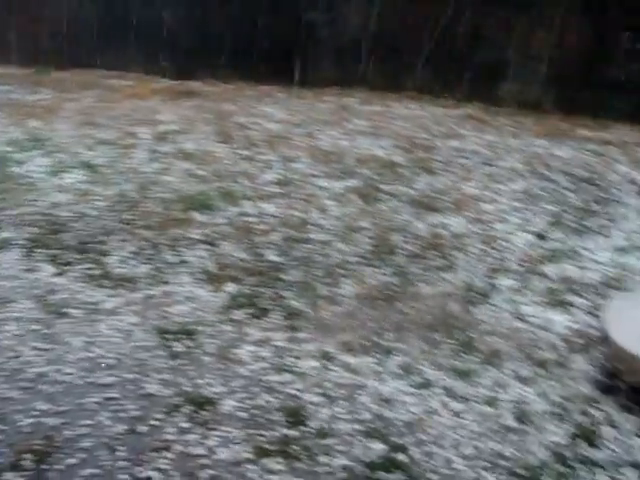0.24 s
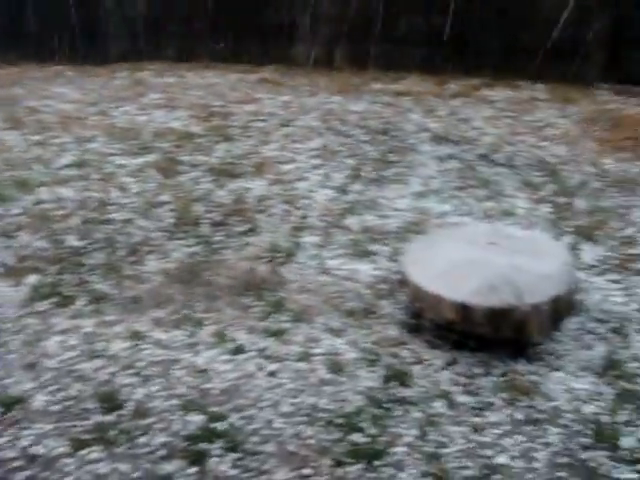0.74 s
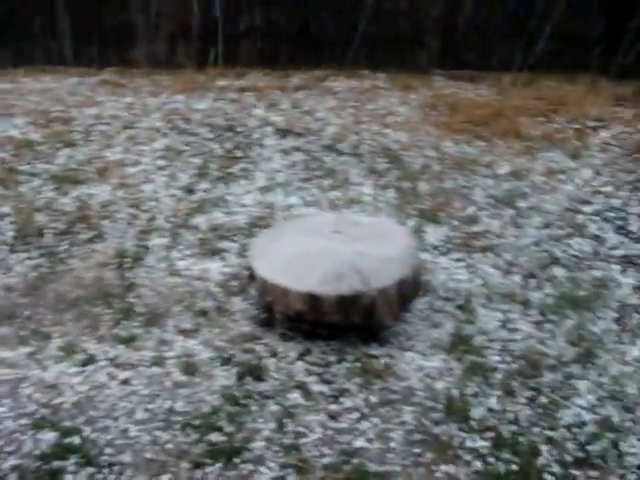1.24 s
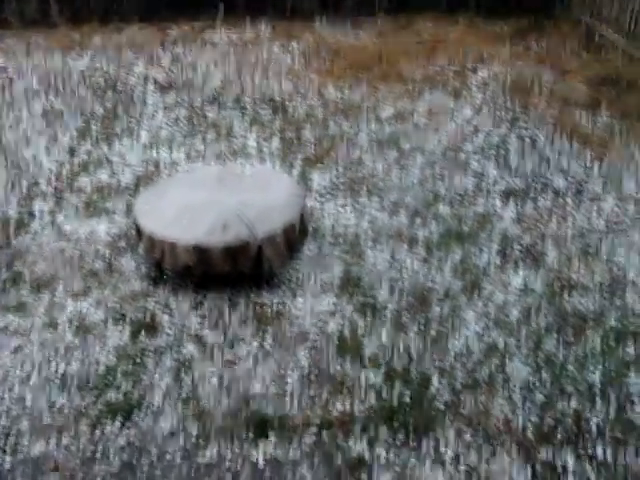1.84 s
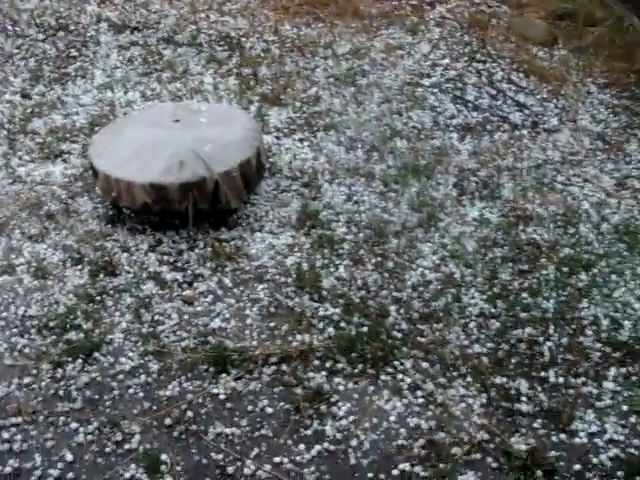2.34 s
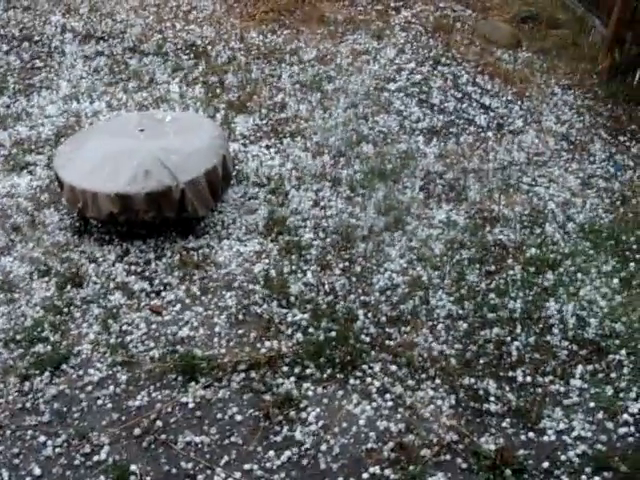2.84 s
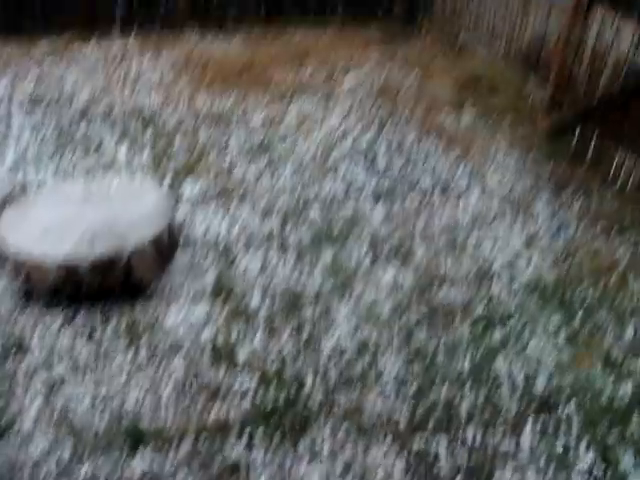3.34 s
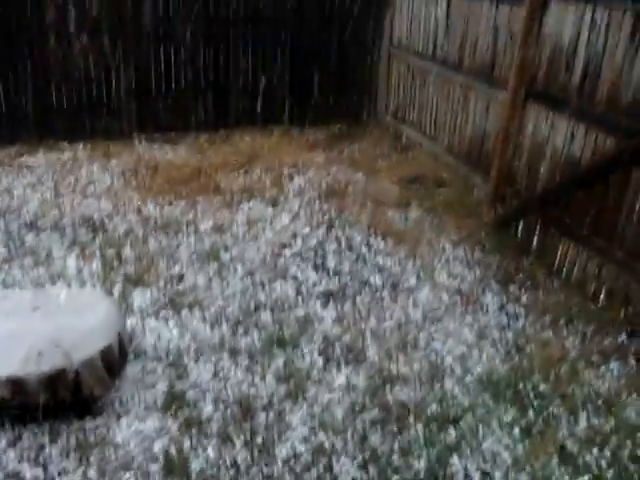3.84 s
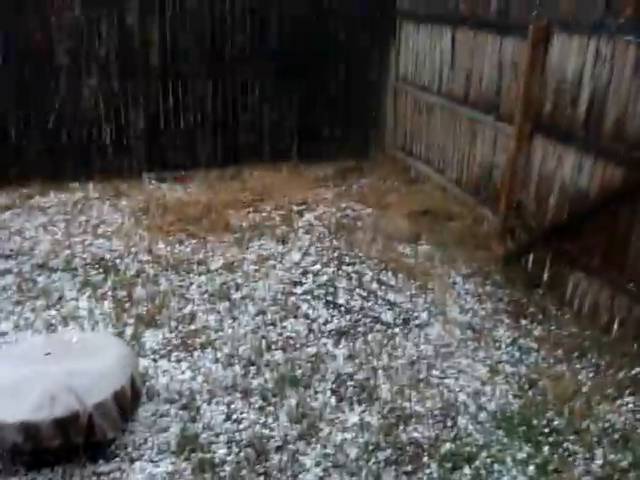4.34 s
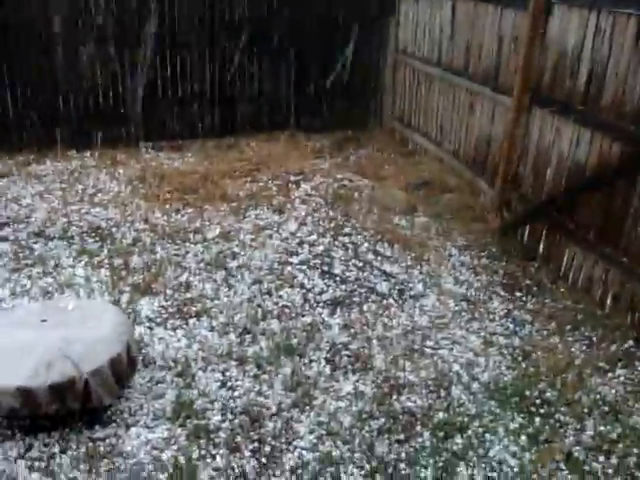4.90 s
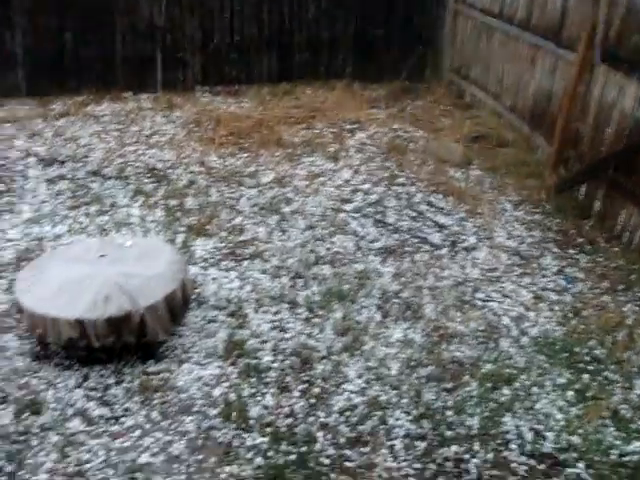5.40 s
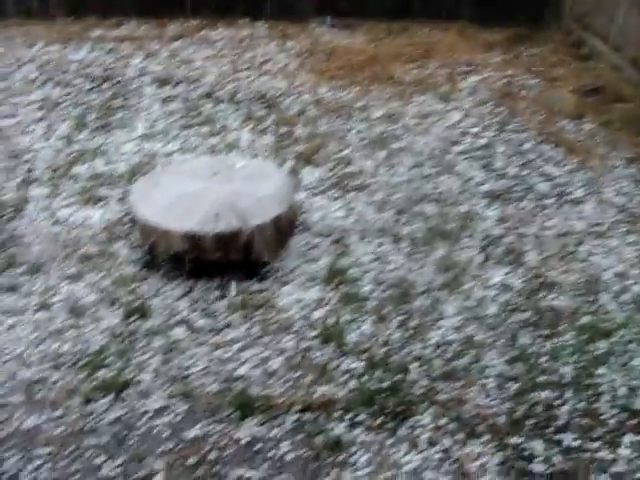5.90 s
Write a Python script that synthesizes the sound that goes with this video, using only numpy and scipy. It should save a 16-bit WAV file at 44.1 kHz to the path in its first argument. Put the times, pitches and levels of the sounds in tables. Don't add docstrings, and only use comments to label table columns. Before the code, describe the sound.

Dense hail pelts a backyard lawn, paving and wooden fence in a steady loud roar, with sharp nearby ticks and occasional dull wooden thuds.

```python
import sys
import numpy as np
from scipy import signal
from scipy.fft import rfft, irfft, next_fast_len
from scipy.io import wavfile

SR = 44100
rng = np.random.default_rng(int(sys.argv[2]) if len(sys.argv) > 2 else 0)


def unload_wav(signal):
    wavfile.write(
        sys.argv[1],
        SR,
        np.round(np.clip(np.atleast_2d(signal).T, -1, 1) * 32767).astype(np.int16),
    )


def undo_db(level):
    steps = np.asarray(level, float) / 20
    return 10 ** steps


N = 271656

# t/s, density/dB, lean/dB
SHOWER = [(0, -17.5, 2.5), (.2, -17.5, 0), (.6, -17, 1), (.75, -18.5, -0.5), (1.28, -17.5, 0.5),
          (1.5, -17.5, 0.5), (1.95, -20.5, -0.5), (2.2, -17.5, 0.5), (3.4, -17.5, -0.5), (3.5, -17.5, 0),
          (3.7, -17.5, -1), (4.4, -18, -1), (4.9, -17, -0.5), (5.25, -19.5, 0.5), (5.42, -17.5, 1),
          (5.65, -19.5, -0.5), (5.85, -18, 2.5), (6.16, -20, -0.5)]
# f/Hz, level/dB
ROAR_COLOUR = [(25, -26), (217, -7), (705, -1.5), (1390, -4.5), (3700, -3), (5670, -10.5), (9370, -11.5),
               (10100, -18)]
SPLITS = (1200, 5000)
# t/s, rise/dB
FLURRIES = [(.43, 0), (.665, 4.5), (1.26, 4), (1.56, 3), (1.88, 4), (2.28, 1.5), (2.86, 2.8), (3.23, 2.5),
            (3.34, 1.5), (3.51, 1), (3.86, 4), (4.15, 3.5), (4.67, 3), (4.93, 2), (6.03, 0)]
# t/s, depth/dB
DUCKS = [(.18, 5.5), (.75, 1), (1.33, 3.5), (1.47, 4.2), (1.82, 2.1), (1.92, 1), (2.36, 1.5), (2.91, 3.1),
         (3.55, 2.5), (4.25, 2.5), (4.97, 2.5), (5.2, 1), (5.65, 0), (5.99, 0.5)]
# t/s, peak level/dB, ring f/Hz
BOOMS = [
    (1.348, -18, 304),
    (1.409, -20, 231),
    (1.424, -19, 335),
    (3.811, -20, 353),
    (4.062, -18.5, 239),
    (4.178, -21.5, 232),
    (5.434, -16.5, 340),
    (5.714, -22, 217),
    (5.899, -20, 400),
    (5.93, -23, 156),
]
# t/s, peak level/dB, ring f/Hz
THUDS = [(1.319, -23, 710), (1.334, -18, 657), (1.349, -11.5, 766), (1.409, -18, 547), (1.996, -14, 590),
         (2.165, -20, 940), (2.656, -20, 675), (3.381, -16, 710), (3.417, -15, 615), (3.81, -31, 720),
         (4.064, -12, 725), (4.18, -17, 440), (4.859, -17, 820), (5.359, -14, 740), (5.398, -18, 1040),
         (5.434, -14, 600), (5.718, -18, 820), (5.759, -15, 620), (5.875, -16, 690), (5.899, -15, 563),
         (5.915, -19, 720), (3.48, -13, 800), (.6, -15, 654), (.99, -16, 720)]
# t/s, peak level/dB, ring f/Hz
PAVING = [(.2354, -11, 4160), (.6784, -2, 3560), (.7344, -7, 3380), (.7374, -7, 3230), (.9954, -16, 2900),
          (1.0114, -2, 3620), (1.3094, 2, 4250), (1.8522, 2.5, 4130), (2.2994, 0, 3420),
          (2.4354, -0.5, 3250), (2.6234, 1, 3520), (2.7284, -3, 3920), (2.7354, 0, 3700),
          (2.8854, -9, 3070), (2.9023, 0, 4070), (3.1244, -2.5, 3080), (3.3954, -6, 3450),
          (3.5204, -1, 3100), (3.7264, -7, 4230), (3.7828, -3, 3550), (3.8534, 0, 3770), (4.4054, -2, 4150),
          (4.4134, -0.5, 3560), (4.565, 0.5, 3120), (4.6144, -12, 4020), (5.002, -3, 4550),
          (5.4354, -1, 3500), (5.5984, 0, 3400), (5.6254, -1, 4120), (6.1165, 3, 3930)]
# t/s, peak level/dB, ring f/Hz
FENCE = [(.0204, -13, 1960), (.3544, -8, 1680), (.4614, -1, 2020), (1.2944, -2, 1860), (1.6244, -1.5, 1310),
         (1.9026, -6, 2240), (3.1514, -9, 2650), (3.4754, -9, 2220), (3.5004, -2, 2350), (3.5793, 0, 2820),
         (3.8114, -3, 2370), (4.0324, -4, 2000), (4.7254, 1.5, 1410), (5.1936, 0, 2500), (5.3926, -4, 1620),
         (5.9705, 1.5, 3400), (5.9735, 1, 2510)]
# t/s, peak level/dB, ring f/Hz
BURSTS = [(.1274, -4, 2960), (.173, -7, 2330), (.674, -16, 2050), (1.3922, -13, 2760), (1.8054, -8, 3560),
          (1.8754, -4, 3070), (1.8834, -20, 2170), (4.3504, -5, 3640), (4.8224, -13, 2050),
          (4.9412, -7, 2570), (5.0694, -2, 1960), (5.1344, -8, 3100)]
# t/s, extra step level/dB, lowest f/Hz affected
STARVED = [(0.165, 28, 7500), (0.189, 36.5, 7000), (0.688, 45, 6400), (1.399, 13, 6500), (1.47, 6, 8000),
           (1.799, 20, 6000), (1.865, 23, 5000), (1.895, 11, 5500), (1.91, 16, 5540), (2.91, 10, 5000),
           (3.55, 5, 5200), (3.839, 26, 5000), (4.25, 22, 6950), (4.87, 6, 6500), (4.98, 14, 6000),
           (5.20, 10, 7000), (5.64, 13, 6000), (5.987, 31, 6000), (6.13, 15, 5000)]

ROOF_DB, ICE_DB = -5, -7.5
ICE_FOLLOWS = 0.29
FLURRY_S = 0.013
DUCK_ATTACK_S, DUCK_RELEASE_S = 0.0087, 0.036
TICK_T60_S, TICK_SUSTAIN_PER_DB = 0.0041, 0.14
PAVING_CRACK_DB, FENCE_CRACK_DB, BURST_CRACK_DB = -17.5, -21, -8


def rms_one(x):
    return x / np.sqrt(np.mean(x ** 2) + 1e-20)


def drift(rate):
    r = np.exp(-40 * np.pi * rate / SR)
    slow = signal.lfilter([1], [1, -2 * r, r * r], rng.standard_normal(N // 20 + 4002))[4000:]
    return np.interp(np.arange(N) / 20, np.arange(len(slow)), rms_one(slow))


def impacts(count, spread_db):
    when, size, sign = rng.random((3, count))
    strength_db = spread_db * np.minimum(-np.log(size + 1e-9), 4.5)
    out = np.zeros(N)
    out[(when * N).astype(int)] = undo_db(strength_db) * np.sign(sign - .5)
    return rms_one(out)


def ring(clicks, hz, t60):
    r, w = undo_db(-60 / (t60 * SR)), 2 * np.pi * hz / SR
    return signal.lfilter([0, np.sin(w)], [1, -2 * r * np.cos(w), r * r], clicks + 1e-18)


def swell(click, hz, t60):
    x = ring(ring(click, hz, t60), hz, t60)
    return x / np.abs(x).max()


def levels():
    t = np.arange(N) / SR
    s, density, lean = np.transpose(SHOWER)
    density, lean = np.interp(t, s, density), np.interp(t, s, lean)
    duck = 0
    for s, db in DUCKS:
        fade_s = np.where(t < s, DUCK_ATTACK_S, DUCK_RELEASE_S)
        duck = duck + db * np.exp(-np.abs(t - s) / fade_s)
    flare = sum(db * np.exp(-((t - s) / FLURRY_S) ** 2) for s, db in FLURRIES)
    mean = density.mean()
    ice = ICE_DB + mean + ICE_FOLLOWS * (density - mean) + flare
    roof = density + ROOF_DB + lean
    return undo_db(np.array([roof, density, ice]) - duck)


def shower():
    layers = np.zeros((3, N))
    gust = drift(31)
    far = rng.standard_normal((2, N))
    shared = impacts(count=4000, spread_db=4.0)
    edges = 20 * 2 ** np.arange(0, 9.6, .5)
    for k, (low, high) in enumerate(zip(edges, edges[1:])):
        hz = np.sqrt(low * high)
        own = impacts(count=int(hz / 2) + 50, spread_db=2.5)
        shared_db = -3.5 + 2.5 * (hz > 3000)
        blows = far[k % 2] + undo_db(shared_db) * shared + undo_db(-5) * own
        band = signal.sosfilt(signal.butter(2, [low, high], "band", fs=SR, output="sos"), blows)
        wander_db = 0.57 * gust + 0.28 * drift(18) + 0.55 * drift(4.2)
        layers[np.searchsorted(SPLITS, hz)] += undo_db(wander_db) * band
    size = next_fast_len(N)
    bins = np.log(np.arange(size // 2 + 1) * SR / size + 1)
    colour_hz, colour_db = np.transpose(ROAR_COLOUR)
    colour = undo_db(np.interp(bins, np.log(colour_hz), colour_db))
    layers = irfft(rfft(layers, size) * colour, size)[:, :N]
    return sum(gain * rms_one(layer) for gain, layer in zip(levels(), layers))


def thuds():
    span = 4000
    out = np.zeros(N + span)
    click = np.eye(1, span)[0]
    for table, t60, knock_hz in ((THUDS, .025, 520), (BOOMS, .04, 210)):
        knock = undo_db(-5) * swell(click, knock_hz, t60 / 2)
        for s, db, hz in table:
            at = round(s * SR)
            out[at:at + span] += undo_db(db - 3) * (swell(click, hz, t60) + knock)
    return out[:N]


def ticks():
    span = 1200
    out = np.zeros(N + span)
    click = np.eye(1, span)[0]
    crack = swell(click, 7000, .0009) + undo_db(-1) * swell(click, 2400, .0012)
    surfaces = ((PAVING, PAVING_CRACK_DB), (FENCE, FENCE_CRACK_DB), (BURSTS, BURST_CRACK_DB))
    hits = [(*row, crack_db) for table, crack_db in surfaces for row in table]
    chances = rng.random((len(hits), 4))
    for (s, db, hz, crack_db), (lag, lag2, up, down) in zip(hits, chances):
        t60 = TICK_T60_S * np.exp(TICK_SUSTAIN_PER_DB * db)
        body = swell(click, hz, t60) + undo_db(crack_db + 14) * crack
        higher = swell(click, hz * (1.05 + .15 * up), .003)
        lower = swell(click, hz * (.85 - .3 * down), .003)
        body += undo_db(-7) * np.roll(higher, int(120 * lag))
        body += undo_db(-5) * np.roll(lower, int(120 * lag2))
        at = round((s + .0004) * SR)
        out[at:at + span] += undo_db(db - 7) * body
    return out[:N]


def scene():
    no_bass = signal.butter(3, 140, "high", fs=SR, output="sos")
    near = signal.sosfilt(no_bass, thuds() + ticks())
    return np.tile(shower() + near, (2, 1))


def thrifty_treble(x, step_db, starve_db, flutter_db, start_hz):
    hz, t, z = signal.stft(x, SR, nperseg=448)
    band = np.floor(np.log2(np.maximum(hz, 1) / start_hz) * 6).astype(int)
    swing, error = rng.normal(0, 1, (2, band.max() + 1, len(t)))[:, np.maximum(band, 0)]
    swing = swing + .5 * np.roll(swing, 1, axis=1)
    short_db = sum(db * np.outer(hz > low, np.exp(-((t - s) / .009) ** 4)) for s, db, low in STARVED)
    step = undo_db(step_db + short_db + starve_db * swing)
    passed = 1 / (1 + (step / (np.abs(z) + 1e-12)) ** 10)
    keep = undo_db(flutter_db * error) * passed + undo_db(-31)
    z = np.where(band[:, None] >= 0, z * keep, z)
    return signal.istft(z, SR, nperseg=448)[1][:N]


def band_limit(x):
    return signal.sosfilt(signal.butter(12, 11090, fs=SR, output="sos"), x)


def record(dry):
    top = undo_db(-5.2)
    x = dry[0] / (1 + np.abs(dry[0] / top) ** 8) ** (1 / 8)
    x = signal.sosfilt(signal.butter(2, 65, "high", fs=SR, output="sos"), x)
    x = signal.sosfilt(signal.ellip(12, .5, 90, 10150, fs=SR, output="sos"), x)
    x = thrifty_treble(x, step_db=-58, starve_db=10, flutter_db=2.2, start_hz=4950)
    return band_limit(np.tile(x, (2, 1)))


dry = scene()
out = record(dry)
unload_wav(out)
```